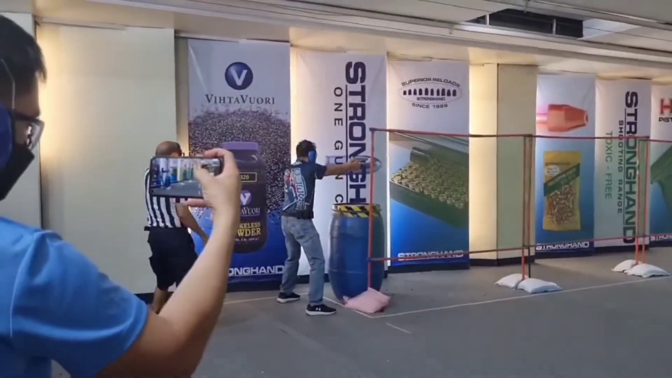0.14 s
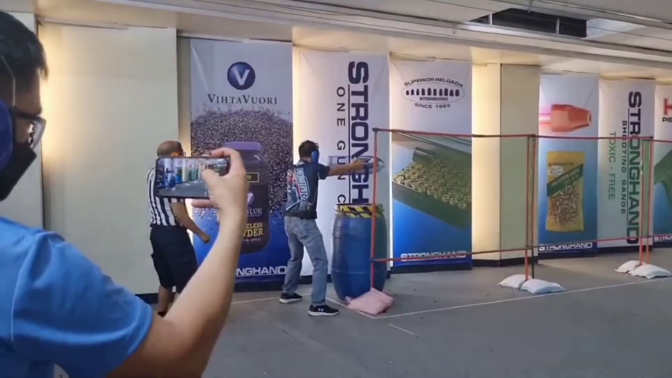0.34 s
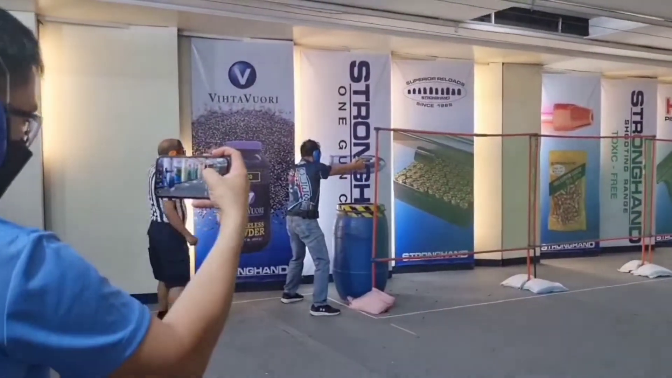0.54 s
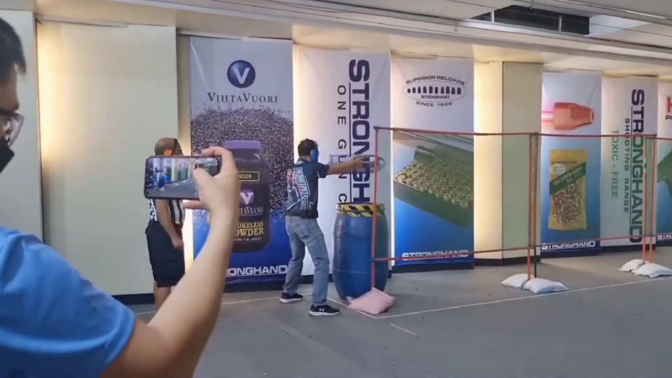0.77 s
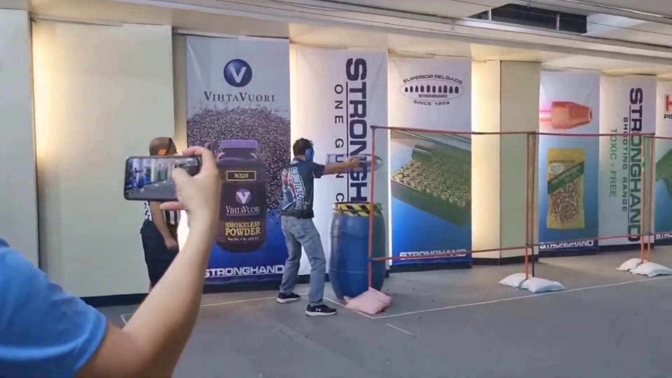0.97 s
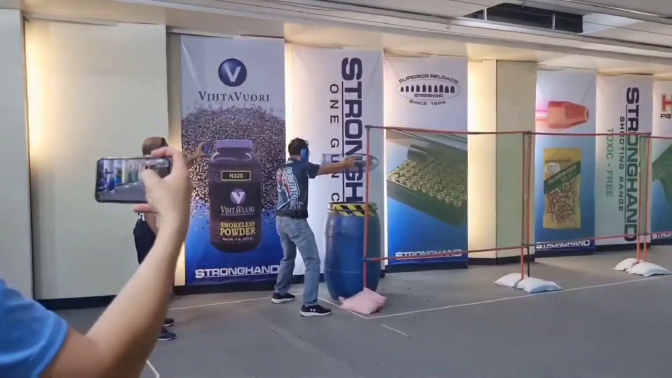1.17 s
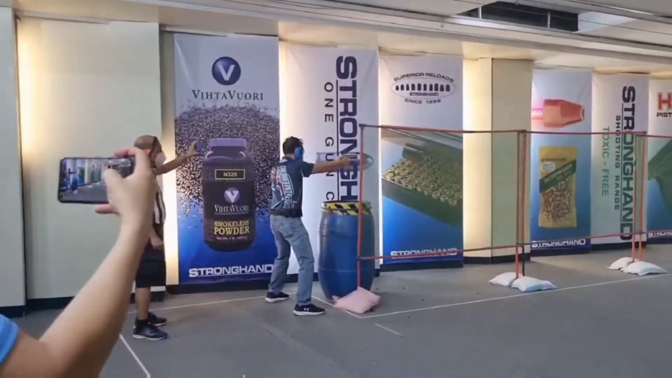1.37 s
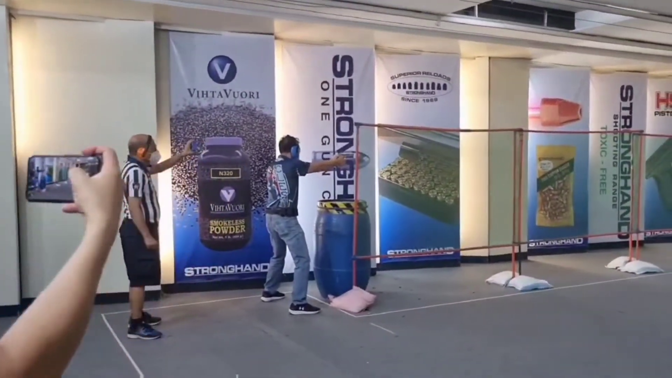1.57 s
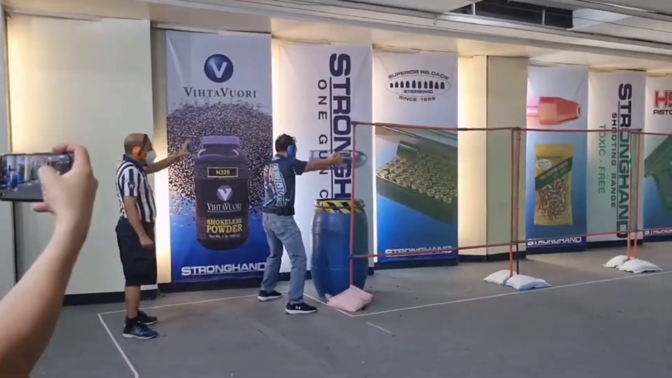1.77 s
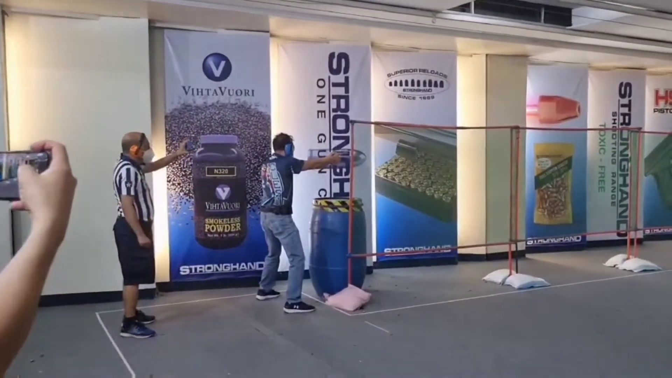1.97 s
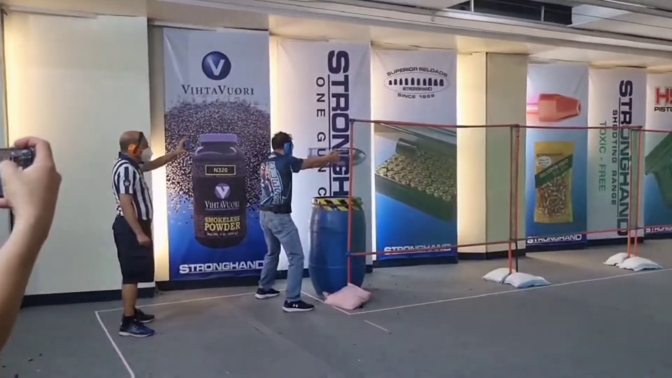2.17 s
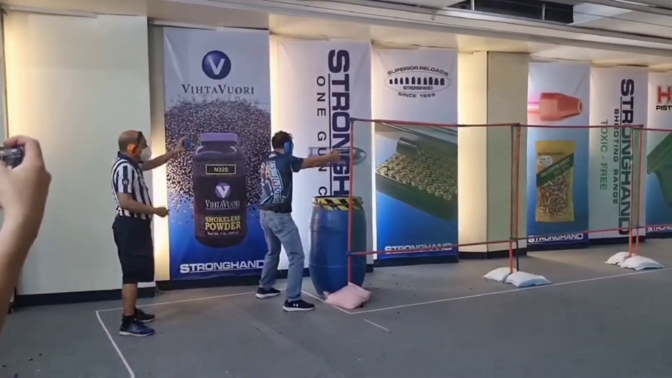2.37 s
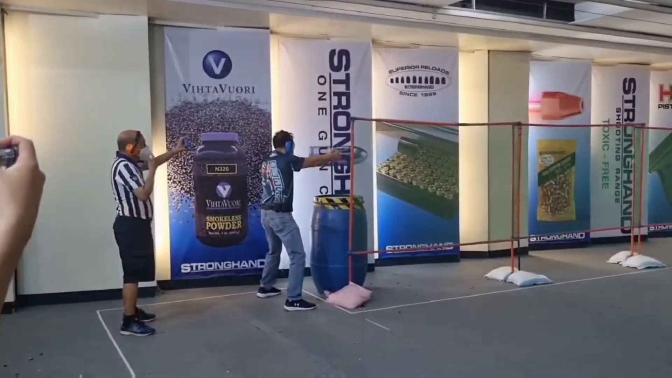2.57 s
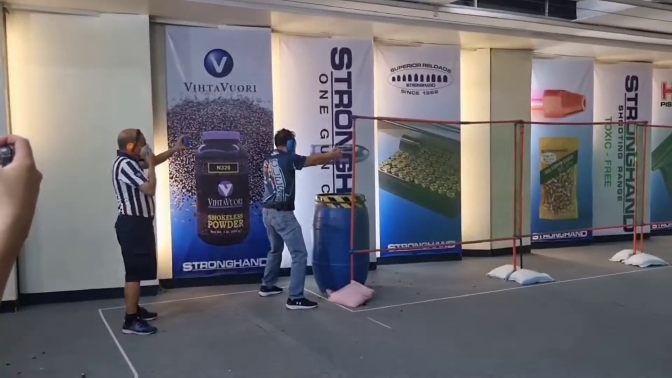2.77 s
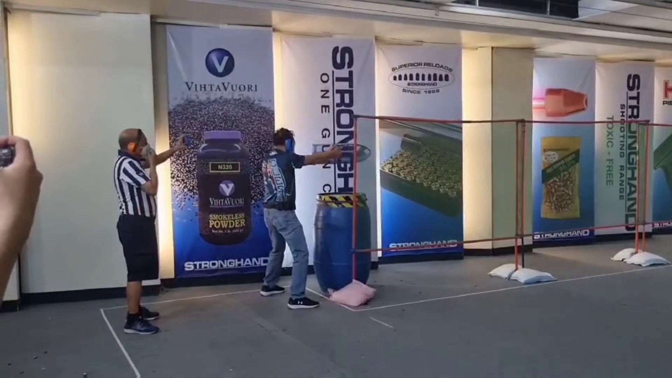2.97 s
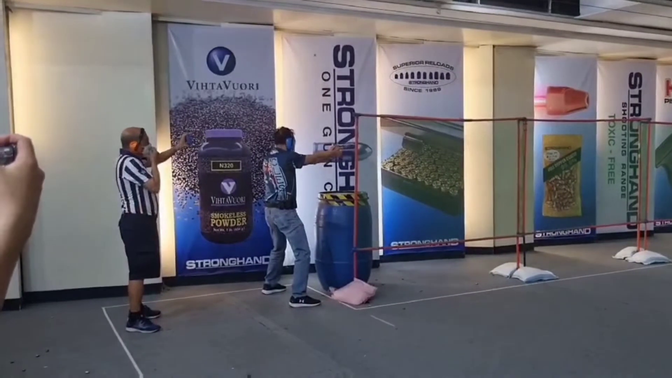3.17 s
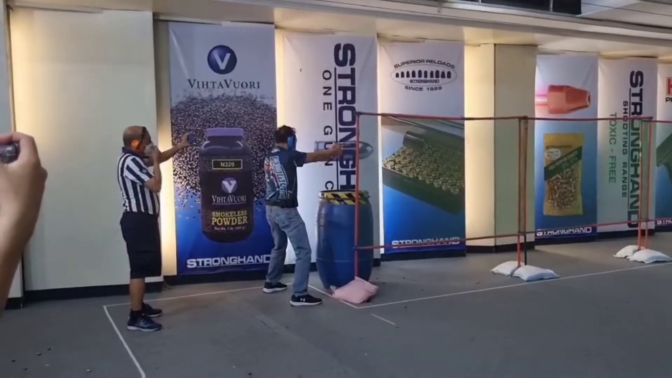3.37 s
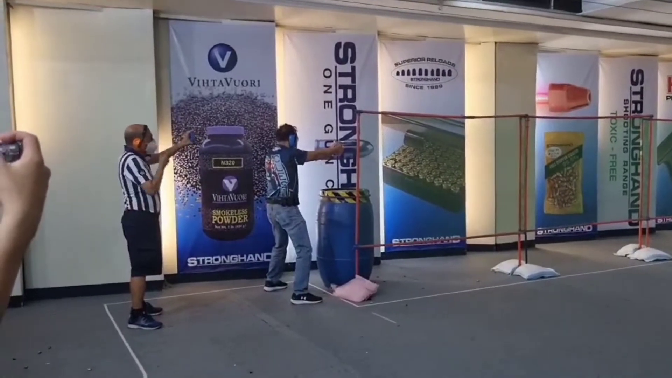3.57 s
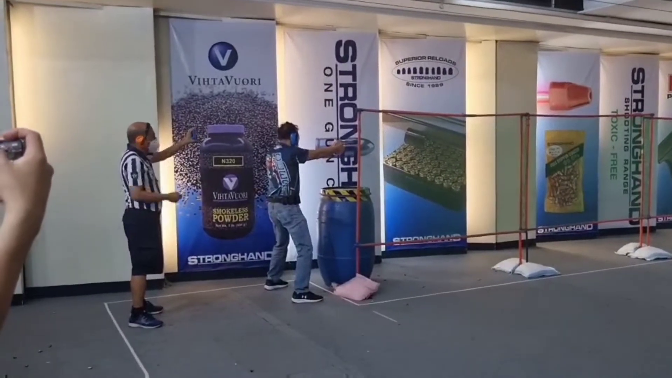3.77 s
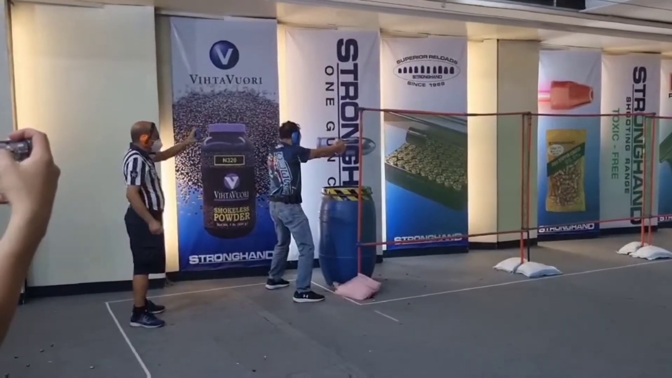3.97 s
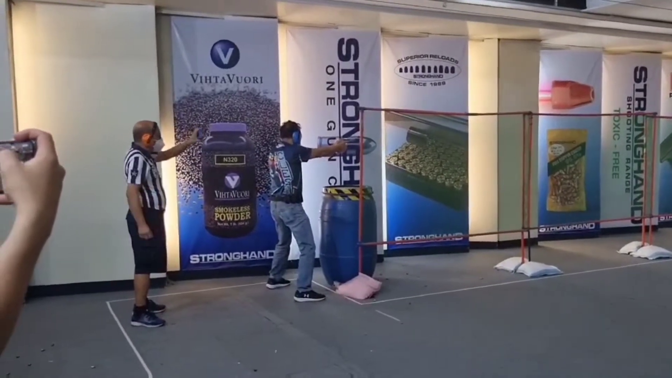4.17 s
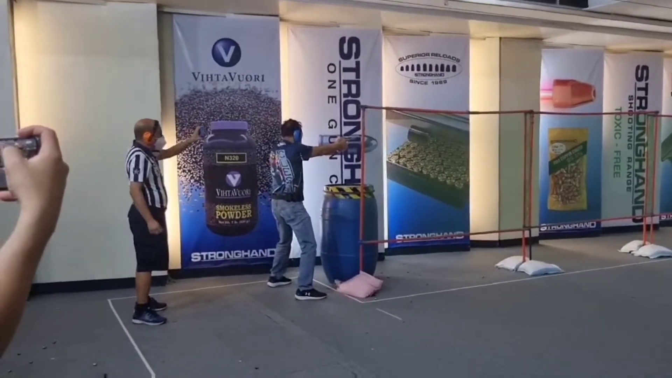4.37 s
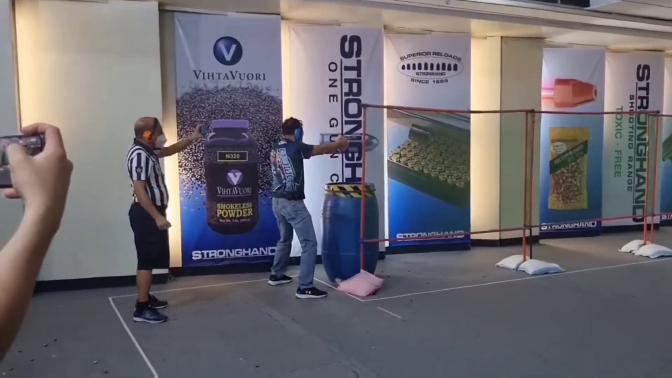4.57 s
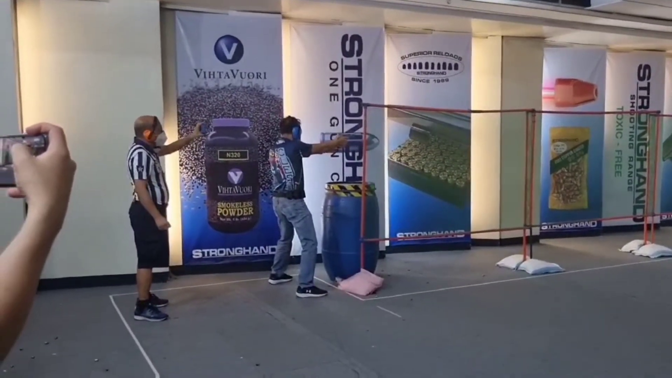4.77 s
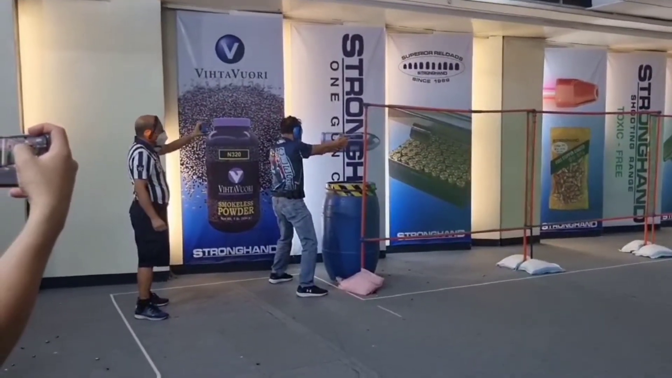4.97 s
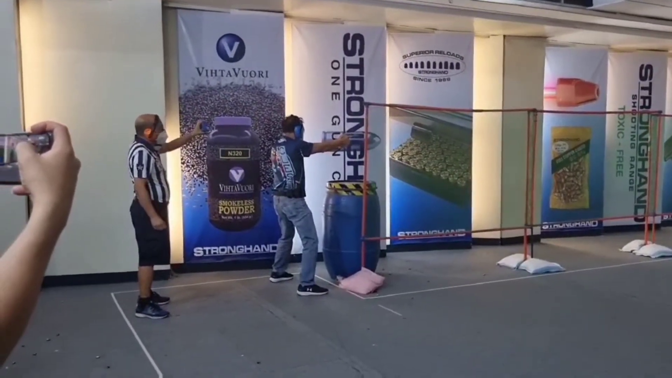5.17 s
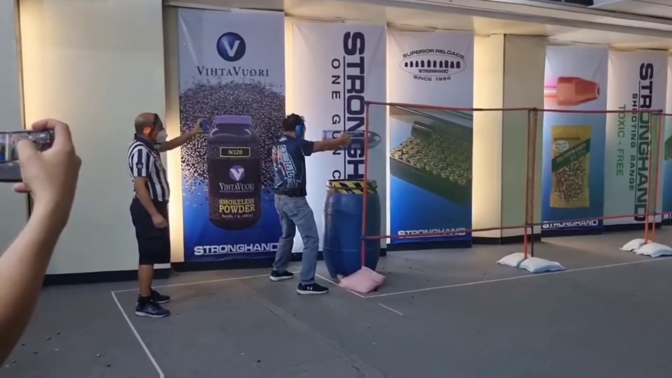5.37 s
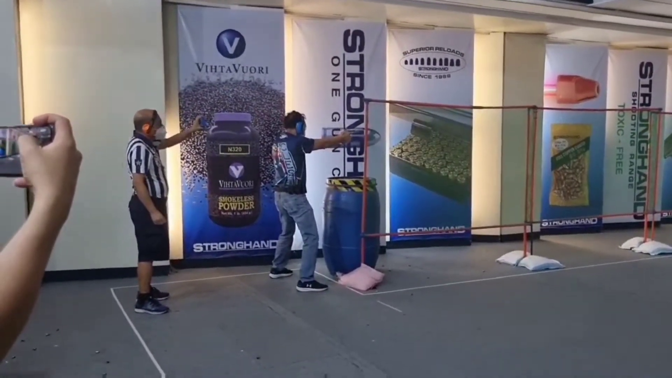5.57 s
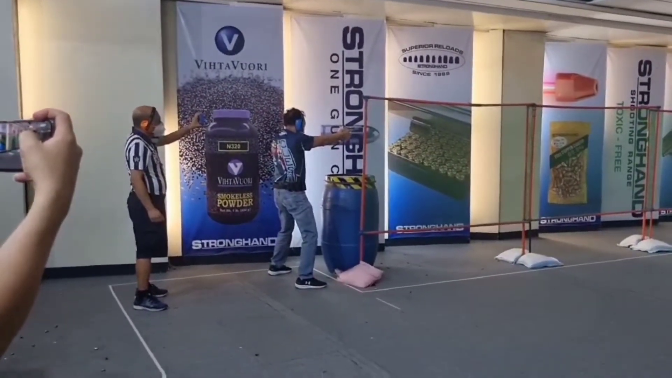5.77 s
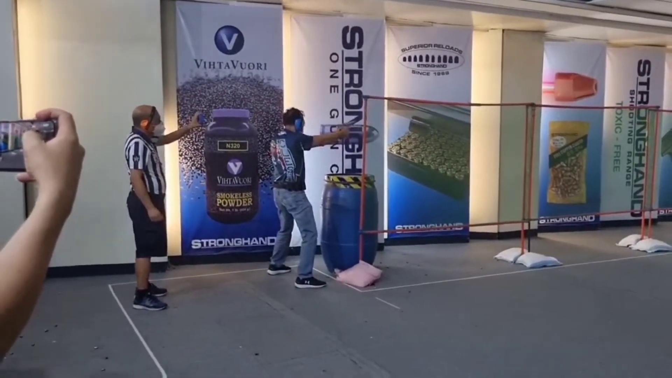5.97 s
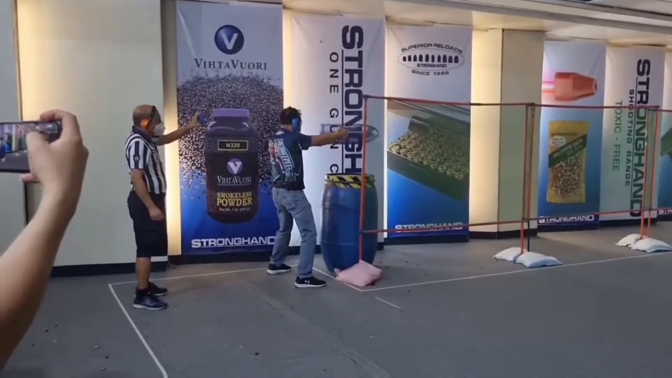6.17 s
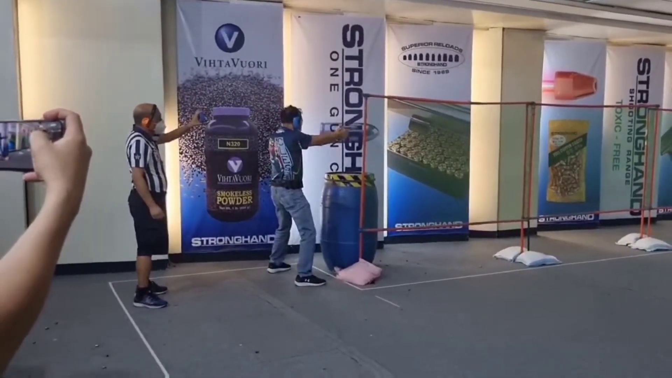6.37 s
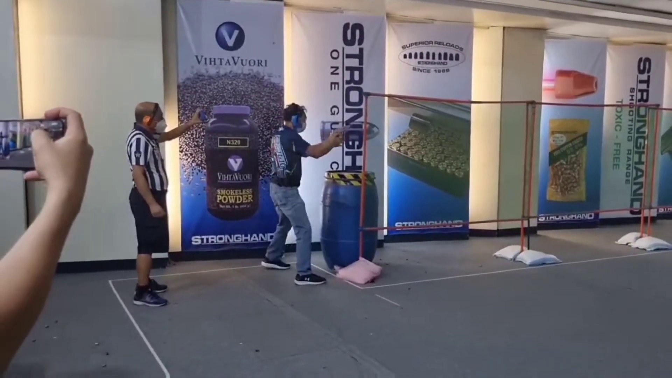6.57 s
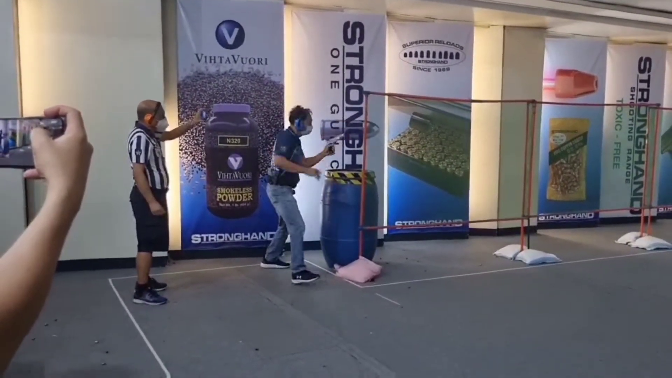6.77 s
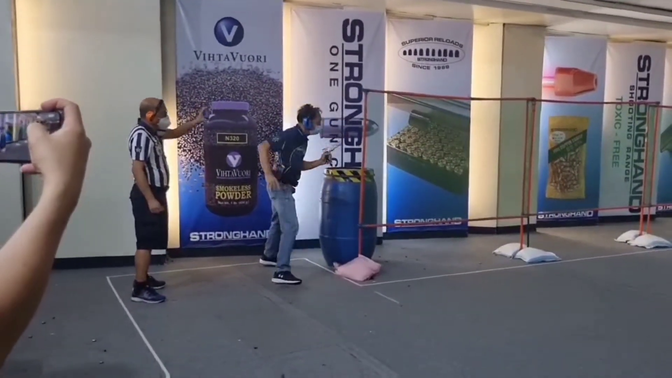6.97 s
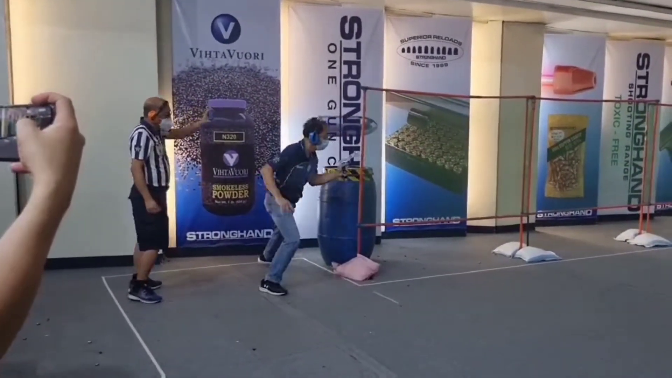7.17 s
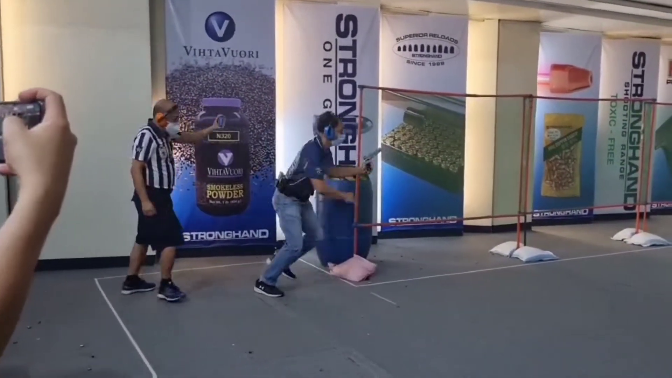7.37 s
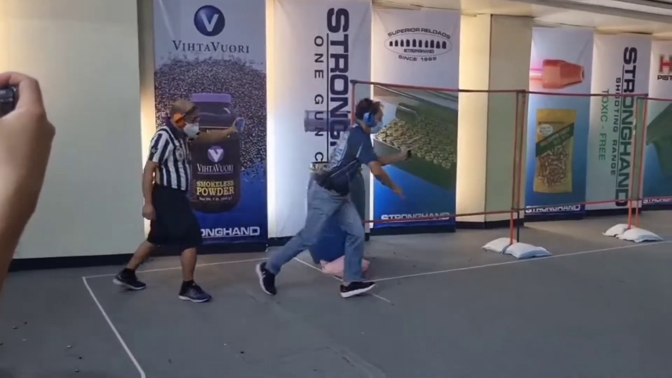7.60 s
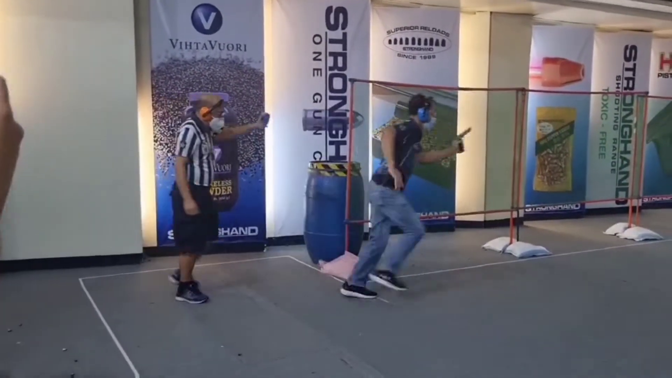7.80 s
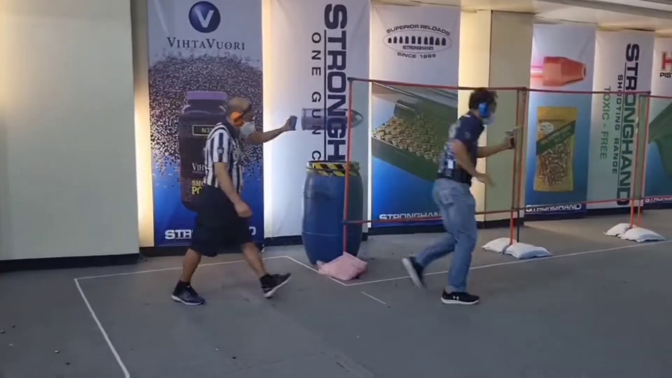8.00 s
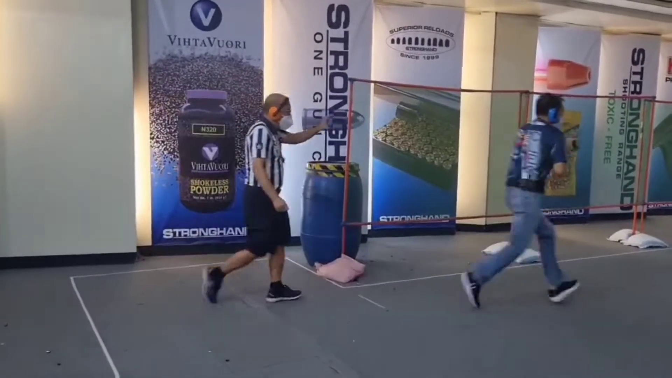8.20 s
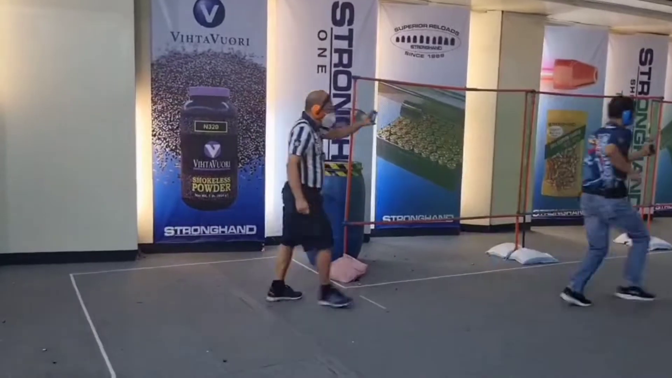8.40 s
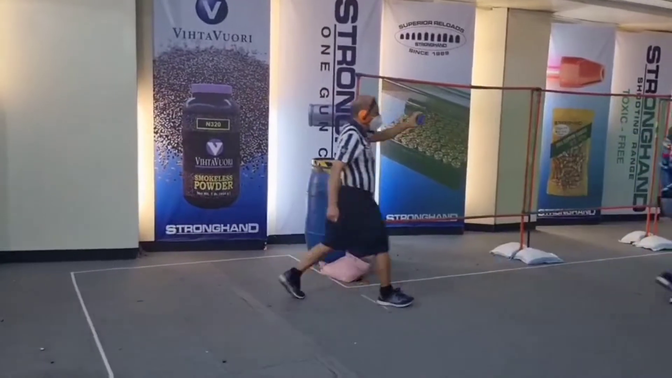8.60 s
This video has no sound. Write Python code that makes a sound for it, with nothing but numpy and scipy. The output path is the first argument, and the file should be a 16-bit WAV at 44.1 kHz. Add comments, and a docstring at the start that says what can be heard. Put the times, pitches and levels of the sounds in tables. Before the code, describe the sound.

Recorded in stereo from several metres behind a shooter in a hard, reverberant hall. Fans drone steadily until a pistol blasts four times, the last two closer together. Every blast is clipped, followed by a dense short roar with far-wall echoes and a pumped-down background that slowly recovers. Small dull knocks and clicks of falling cases come between; a plate rings after the fourth shot, and quick running steps end it.

```python
"""Ventilation hums in a concrete indoor range, then four pistol shots crack and roar through it.
About a second after each shot its spent case knocks on the floor and may bounce; a steel plate rings
after the last shot, and shoes scuff and thud as the shooter runs off. Fans are sine lines over noise, impacts are
damped partials and noise, and the hall is fading noise. Each blast overloads the microphone,
whose gain control ducks the whole room and lets it swell back."""
import sys
import numpy as np
from scipy import signal
from scipy.fft import rfft, irfft, next_fast_len
from scipy.io import wavfile
from scipy.ndimage import map_coordinates

SR = 44100
rng = np.random.default_rng(int(sys.argv[2]) if len(sys.argv) > 2 else 0)


def output_pcm(signal):
    """Save a mono or channel-first signal as 16-bit PCM at the path in sys.argv[1].

    Samples are clipped to [-1, 1] before scaling.
    """
    pcm = np.clip(np.atleast_2d(signal).T, -1, 1) * 32767
    wavfile.write(sys.argv[1], SR, np.round(pcm).astype(np.int16))


N = 381148

# Spectra give relative density in dB per Hz; likeness runs from 1 (same at both ears) through 0 (unrelated).
# Hum lines of the ventilation motor: turn_multiple, level_db
HUM_LINES = [(1, -46.5), (2, -30), (3, -51.5), (4, -40.5), (6, -44), (7, -44), (8, -46), (10, -51),
             (11, -50.5), (12, -46)]
# Rushing air spectrum: freq_hz, density_db
AIR_SPECTRUM = [(25, -8.5), (60, 1.5), (100, 0), (170, -2.5), (380, -5), (750, -8.5), (1300, -14),
                (2500, -18), (3800, -22.5), (5200, -19.5), (6500, -26.5), (8000, -21.5), (11500, -29),
                (15000, -29)]
# Likeness of left and right in most diffuse noise: freq_hz, likeness
ROOM_LIKENESS = [(60, 0.89), (150, 0.98), (380, 0.71), (950, 0.12), (2380, -0.13), (5980, 0.1),
                 (15000, -0.19)]
# Likeness of left and right in reverberation: freq_hz, likeness
REVERB_LIKENESS = [(100, 0.94), (280, 0.98), (560, 0.75), (1000, 0.33), (2400, -0.055), (6000, 0.036),
                   (14000, 0.12)]
# Decay time of the concrete hall: freq_hz, t60_s
HALL_DECAY = [(60, 1.3), (200, 0.7), (700, 0.85), (1400, 0.81), (2300, 0.78), (5000, 0.69), (8000, 0.61),
              (13000, 0.44)]
# Heel thud spectrum: freq_hz, density_db
THUD_SPECTRUM = [(25, 1.5), (60, -18), (130, 2), (220, -8.5), (400, -21), (1000, -43), (8000, -61)]
# Sole scrape spectrum: freq_hz, density_db
SCUFF_SPECTRUM = [(100, -9), (800, 1), (2500, -3), (6000, -6.5), (9000, -13), (15000, -32)]
# Soles scraping the floor: start_s, level_db, bright_edge_hz
SOLE_SCUFFS = [(7.976, -16, 14000), (8.104, -21, 3220), (8.515, -23.5, 1400)]
# Spent cases landing and bouncing: start_s, knock_db, distance_m, rim_slap_db (relative to the knock)
CASE_LANDINGS = [(1.7724, 2.5, 4.2, -13.5), (2.282, -5.5, 4.3, -24.5), (2.6142, -13, 1.7, -21.5),
                 (2.7496, -24, 1.6, -19.5), (2.812, -35.5, 1.1, -17.5), (3.94, 0, 4.5, -21),
                 (4.4248, -12.5, 4.5, -19.5), (5.877, -4, 5.9, -15), (7.1168, 3.5, 6.3, 4.5),
                 (7.7273, -6, 6.3, -5)]
# Clack of a case contact: freq_hz, density_db
CLACK_SPECTRUM = [(100, -19.5), (200, 5), (400, 1), (850, 7), (1700, 1.5), (3000, -2.5), (15000, -16.5)]
# Ringing of a case on the floor: pitch_hz, relative_level_db, t60_s
CASE_MODES = [(447, 0.5, .12), (789, 5, 0.16), (1180, -7.5, 0.13), (1472, -8, 0.084), (2020, -12.5, 0.11),
              (2235, -11, 0.4), (3140, -22, .12)]
# Inharmonic partials of the knock: pitch_ratio, size
KNOCK_PARTIALS = [(.62, .32), (1, .75), (1.37, .6)]
# Ringing of the target plate: pitch_hz, relative_level_db, t60_s
PLATE_MODES = [(1136, -14, 2.2), (1690, -13, 1.2), (1798, -9, 1.1), (2153, -14, 1.5), (2568, -14.5, 2.0),
               (2859, -25, 1.8), (4070, -18, 1.1)]
# Treble burst spectrum: freq_hz, density_db
TREBLE_BURST_SPECTRUM = [(6000, -26), (10000, 5), (13000, 7), (15500, -21)]
# Pistol shots: start_s, level_db, treble_tilt_db_per_octave
PISTOL_SHOTS = [(0.7569, 24, 0), (2.8906, 24.5, -0.3), (4.6956, 25, -0.5), (6.012, 26, -0.78)]
# Roar of the blast: freq_hz, density_db
BLAST_SPECTRUM = [(25, -19.5), (90, -17.5), (180, -4), (350, 3), (750, 4), (1400, -4.5), (2800, -3),
                  (5600, -11.5), (10000, -11), (15000, -14.5)]
# Echoes from down the range: delay_s, spread_s, swell_db
WALL_ECHOES = [(0.166, 0.044, 1.5), (.23, 0.15, 2.5)]
# Resonances of the microphone ports: freq_hz, left_db, right_db
MIC_PORTS = [(19.9, -8.5, -11.5), (40, -3.5, -2.5), (70, -0.5, -.5), (650, -1, -3), (1500, 2, 2),
             (2025, 2.5, 8), (2300, 4.5, 12.5), (2850, 4, 3.5), (3500, 1.5, 3), (8220, -0.5, 0),
             (9350, -4.5, -7), (12300, -1, 2.5), (15700, -7, -7)]

# The run: first footfall, time per step, heel level, extra weight of the step that pushes off
RUN_START_S, STEP_S, THUD_DB, PUSH_OFF_DB = 8.088, 0.22, -26, 11.5
# At this distance the direct knock is at its listed level
REFERENCE_M = 2.82
# Knock pitch heard from 1 m; it drops by this power of distance
KNOCK_HZ, KNOCK_FALL = 1877, 0.144
# Width of the knock's bell-shaped swell, drawn out by distance
CONTACT_S, SMEAR_S_PER_M = 0.00072, .00017
# Treble edges of the knock and of the rim slap
KNOCK_EDGE_HZ, RIM_EDGE_HZ = 2800, 6400
# The other end of the case slaps down just after
RIM_DELAY_S, RIM_DECAY_S = 0.0044, 0.0059
# Gain control: depth of the duck, time held, time until half its dB are released, calm before it re-trips
DUCK_DB, HOLD_S, RELEASE_S, REARM_S = -28.5, 1.387, 0.39, .5
TOP_HZ = 15500  # band limit of the microphone


def amp(db):
    """Decibels to amplitude."""
    return 10 ** (np.asarray(db) / 20)


def unit(x):
    """Scale to rms 1."""
    return x / np.sqrt(np.mean(x ** 2) + 1e-20)


def along(points, hz):
    """Read a curve of (Hz, value) points on a log frequency axis."""
    point_hz, value = np.transpose(points)
    return np.interp(np.log(hz + 1), np.log(point_hz + 1), value)


def wobble(rate):
    """A smooth random curve with rate knots a second."""
    knots = rng.standard_normal(int(N * rate / SR) + 4)
    return map_coordinates(knots, [np.arange(N) * rate / SR])


def filtered(x, response):
    """Multiply the spectrum of x by a response of frequency."""
    n = x.shape[-1]
    padded = next_fast_len(n + SR // 10)
    spectrum = rfft(x, padded) * response(np.fft.rfftfreq(padded, 1 / SR))
    return irfft(spectrum, padded)[..., :n]


def coloured(x, points, size=2048):
    """Minimum-phase filter with the given (Hz, dB) gain: it resonates only after the sound arrives."""
    gain = amp(along(points, np.fft.rfftfreq(size, 1 / SR)))
    # folding the cepstrum forward makes the filter causal
    cepstrum = irfft(np.log(gain))
    cepstrum[1:size // 2] *= 2
    cepstrum[size // 2 + 1:] = 0
    impulse = irfft(np.exp(rfft(cepstrum)))
    return signal.fftconvolve(x, impulse)[:len(x)]


def add(track, start_s, sound):
    """Mix a sound into the track at its start time."""
    start = round(start_s * SR)
    track[:, start:start + sound.shape[-1]] += sound[..., :N - start]


def diffuse(spectrum, n, likeness=ROOM_LIKENESS):
    """Stereo noise of rms 1 from all sides; shared mid and opposed side set how alike the ears are."""
    def mid_side_gain(hz):
        angle = np.arccos(along(likeness, hz)) / 2
        return amp(along(spectrum, hz)) * np.array([np.cos(angle), np.sin(angle)])

    mid, side = filtered(rng.standard_normal((2, n)), mid_side_gain)
    return unit(np.array([mid + side, mid - side]))


def reverberation(spectrum):
    """Dense reflections as noise, each frequency dying at the hall's own speed."""
    noise = diffuse(spectrum, 2 * SR, REVERB_LIKENESS)
    hz, t, grains = signal.stft(noise, SR, nperseg=256)
    fade_db = -60 * t / along(HALL_DECAY, hz)[:, None]
    return signal.istft(grains * amp(fade_db), SR, nperseg=256)[1][:, :2 * SR]


def room_answer(t, early_s=0.037, early_db=-11, late_db=-20):
    """What follows a contact on the floor: near walls first, over the tail of the hall."""
    near_walls = amp(early_db) * diffuse(CLACK_SPECTRUM, len(t)) * np.exp(-t / early_s)
    return near_walls + amp(late_db) * reverberation(CLACK_SPECTRUM)


def ringing(modes, t, ear_turns=0.45):
    """Decaying modes, at a new phase for every blow and a different one at each ear."""
    out = np.zeros((2, len(t)))
    for hz, db, t60_s in modes:
        phase = rng.random() + ear_turns * rng.random((2, 1))
        out += amp(db - 60 * t / t60_s) * np.sin(2 * np.pi * (hz * t + phase))
    return out


def dulled(x, edge_hz):
    """A soft contact makes little above its edge."""
    return signal.sosfilt(signal.butter(3, edge_hz, fs=SR, output="sos"), x)


def thinned(x, edge_hz):
    """A small, hard contact makes little below its edge."""
    return signal.sosfilt(signal.butter(1, edge_hz, "high", fs=SR, output="sos"), x)


def ventilation(motor_hz=55.2, air_db=-29, drift=.006, waver_db=2):
    """Extractor fans: multiples of a drifting motor speed, each wavering in level, under surging air noise."""
    turns = np.cumsum(motor_hz * (1 + drift * wobble(6))) / SR
    hum = np.zeros(N)
    for multiple, db in HUM_LINES:
        level = amp(db + waver_db * wobble(7.8)) * np.sqrt(2)  # db is the rms level of the sine
        hum += level * np.sin(2 * np.pi * (multiple * turns + rng.random()))
    surge_db = .8 * wobble(2.8)
    air = amp(air_db + surge_db) * diffuse(AIR_SPECTRUM, N)
    return hum + air


def steps(heel_s=0.024, grip_s=0.0012, sole_s=0.053):
    """Scraping soles are bright noise; heels are bass thuds at an even pace after one heavy push-off."""
    out, t = np.zeros((2, N)), np.arange(SR // 2) / SR
    weight = t / heel_s * np.exp(1 - t / heel_s)
    slide = (1 - np.exp(-t / grip_s)) * np.exp(-t / sole_s)
    for k, start_s in enumerate(np.arange(RUN_START_S, N / SR, STEP_S)):
        level_db = THUD_DB + PUSH_OFF_DB * (k == 0)
        add(out, start_s, amp(level_db) * weight * diffuse(THUD_SPECTRUM, len(t)))
    for start_s, level_db, edge_hz in SOLE_SCUFFS:
        scrape = dulled(diffuse(SCUFF_SPECTRUM, len(t)), edge_hz)
        add(out, start_s, amp(level_db) * slide * scrape)
    return out


def cases(ring_db=-16, grit=0.57, slap_db=-4):
    """A case knocks, slaps down on its rim and rings briefly; the nearer it is, the drier it sounds."""
    out, t = np.zeros((2, N)), np.arange(2 * SR) / SR
    for start_s, knock_db, distance_m, rim_db in CASE_LANDINGS:
        direct = REFERENCE_M / distance_m
        knock_hz = KNOCK_HZ / distance_m ** KNOCK_FALL
        # a few cycles of inharmonic partials, roughened by grit
        knock = np.zeros(len(t))
        for ratio, size in KNOCK_PARTIALS:
            knock += size * np.sin(2 * np.pi * (ratio * knock_hz * t + rng.random()))
        touch = np.exp(-(t / (CONTACT_S + SMEAR_S_PER_M * distance_m) - 2) ** 2)
        contact = direct * touch * (knock + grit * diffuse(CLACK_SPECTRUM, len(t)))
        # ring and room build up as the touch completes
        onset = np.cumsum(touch) / touch.sum()
        answer = (amp(ring_db) * ringing(CASE_MODES, t) + room_answer(t)) * onset
        add(out, start_s, amp(knock_db) * dulled(contact + answer, KNOCK_EDGE_HZ))
        slap = direct * amp(slap_db) * np.exp(-t / RIM_DECAY_S) * diffuse(CLACK_SPECTRUM, len(t))
        rim = dulled(thinned(slap + room_answer(t), KNOCK_EDGE_HZ), RIM_EDGE_HZ)
        add(out, start_s + RIM_DELAY_S, amp(knock_db + rim_db) * rim)
    return out


def target(plate_db=-5, waver_db=-1.5, burst_db=-30):
    """The last bullet sets a steel plate's modes ringing unsteadily; a faint treble noise burst follows."""
    out, t = np.zeros((2, N)), np.arange(2 * SR) / SR
    flight_s, burst_delay_s, settle_s = .03, .44, .03
    last_shot_s = PISTOL_SHOTS[-1][0]
    level_db = plate_db + waver_db * wobble(13.9)[:len(t)]
    add(out, last_shot_s + flight_s, amp(level_db) * ringing(PLATE_MODES, t))
    swell = np.sqrt(t / settle_s) * np.exp(1 - t / settle_s)
    burst = diffuse(TREBLE_BURST_SPECTRUM, len(t))
    add(out, last_shot_s + burst_delay_s, amp(burst_db) * burst * swell)
    return out


def pistol(muzzle_db=5, flutter_db=0.4, same_path=0.44):
    """Each muzzle pressure pulse fills the hall with roar at once; far walls send swells back."""
    out, t = np.zeros((2, N)), np.arange(2 * SR) / SR
    pulse_s = .0004  # pressure crosses zero here, then dips below
    muzzle = amp(muzzle_db) * (1 - t / pulse_s) * np.exp(-t / pulse_s)
    echoes_db = sum(db * np.exp(-((t - delay_s) / spread_s) ** 2) for delay_s, spread_s, db in WALL_ECHOES)
    # the shooter stands still, so part of the reflections is the same every time
    standing = reverberation(BLAST_SPECTRUM)
    for start_s, level_db, tilt_db in PISTOL_SHOTS:
        fresh = reverberation(BLAST_SPECTRUM)
        roar = np.sqrt(same_path) * standing + np.sqrt(1 - same_path) * fresh
        roar = filtered(roar, lambda hz: amp(tilt_db * np.log2(1 + hz / 1000)))
        clumps_db = flutter_db * wobble(70)[:len(t)]
        add(out, start_s, amp(level_db) * (muzzle + roar * amp(echoes_db + clumps_db)))
    return out


def scene():
    """The whole range, ahead of the microphone."""
    return ventilation() + steps() + cases() + target() + pistol()


def gain_control(x, threshold_db=17, ahead_s=0.0065):
    """The gain drops at once, just ahead of an overload; it is held down, then creeps back up."""
    t = np.arange(N) / SR
    overloads = t[np.abs(x).max(axis=0) > amp(threshold_db)]
    calm_s = np.diff(overloads, prepend=-np.inf)
    trips = np.append(-np.inf, overloads[calm_s > REARM_S] - ahead_s)
    since_s = t - trips[np.searchsorted(trips, t) - 1]
    releasing_s = np.maximum(since_s - HOLD_S, 0)
    return x * amp(DUCK_DB / (1 + (releasing_s / RELEASE_S) ** 2))


def saturated(x, top_db, knee):
    """Peaks are rounded off towards a ceiling; a higher knee bends more sharply."""
    return x / (1 + np.abs(x / amp(top_db)) ** knee) ** (1 / knee)


def record(dry):
    """Overloaded capsules, gain control, port resonances, full-scale ceiling and band limit."""
    x = gain_control(saturated(dry, top_db=19.5, knee=3.9))
    left = coloured(x[0], [(hz, left_db) for hz, left_db, right_db in MIC_PORTS])
    right = coloured(x[1], [(hz, right_db) for hz, left_db, right_db in MIC_PORTS])
    x = saturated(np.array([left, right]), top_db=-.3, knee=6)
    return filtered(x, lambda hz: 1 / (1 + (hz / TOP_HZ) ** 90))


dry = scene()
out = record(dry)
output_pcm(out)
```